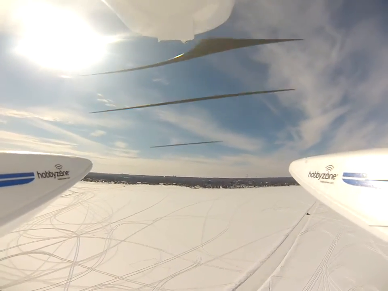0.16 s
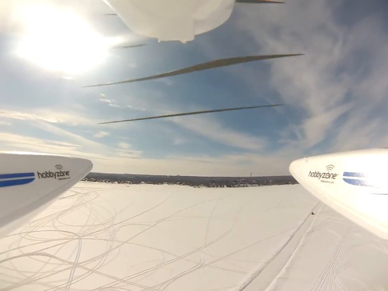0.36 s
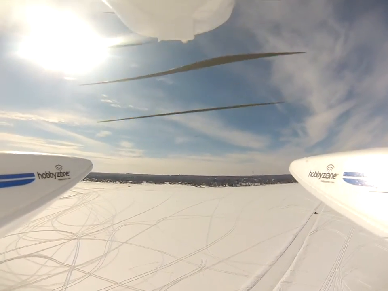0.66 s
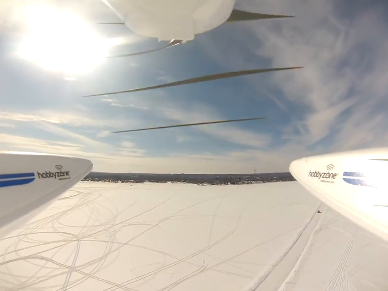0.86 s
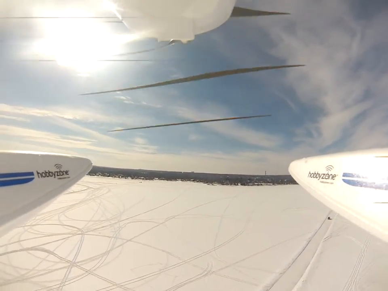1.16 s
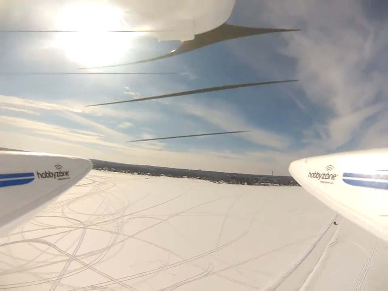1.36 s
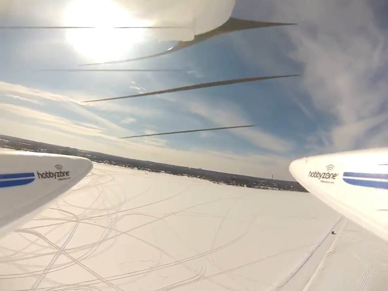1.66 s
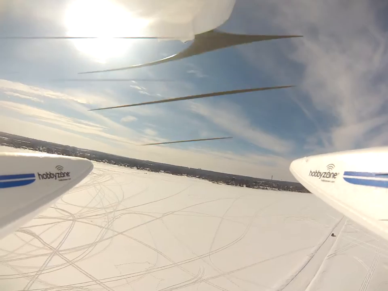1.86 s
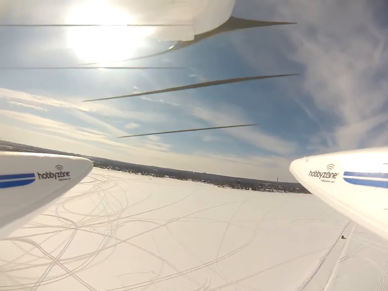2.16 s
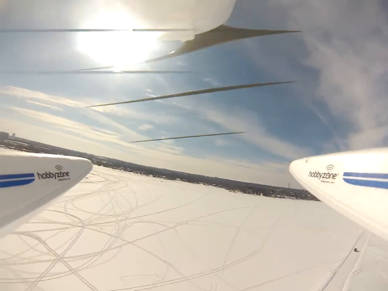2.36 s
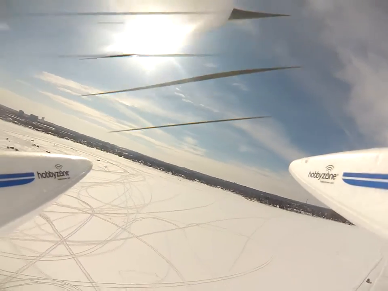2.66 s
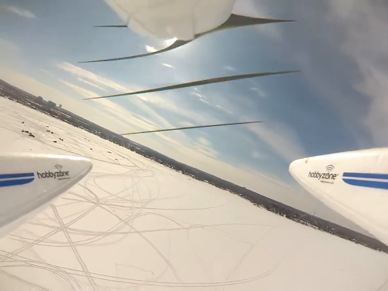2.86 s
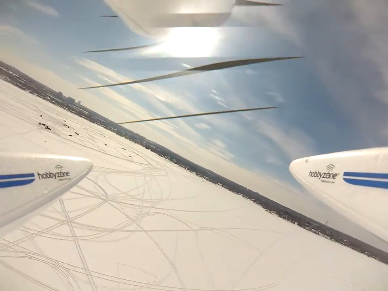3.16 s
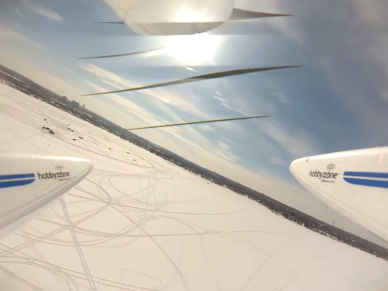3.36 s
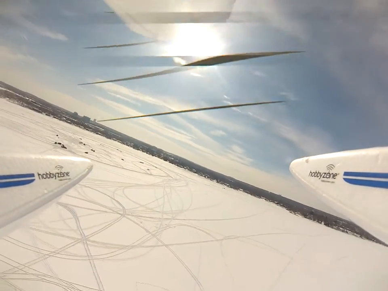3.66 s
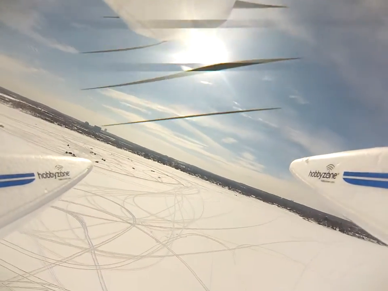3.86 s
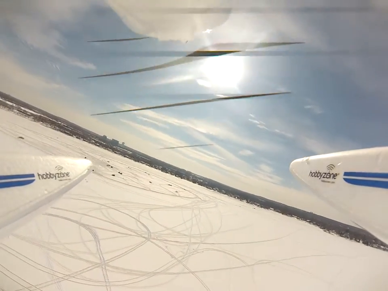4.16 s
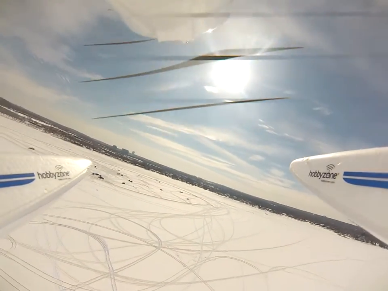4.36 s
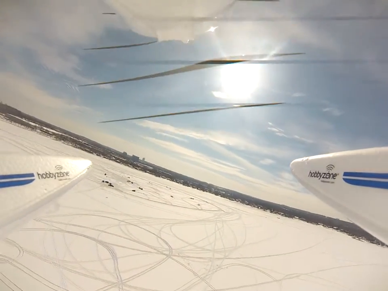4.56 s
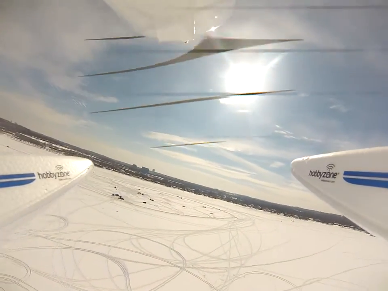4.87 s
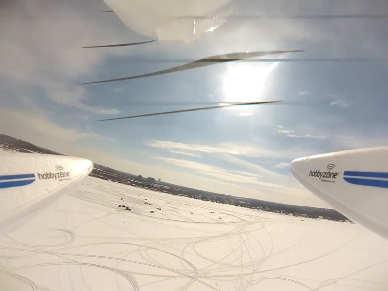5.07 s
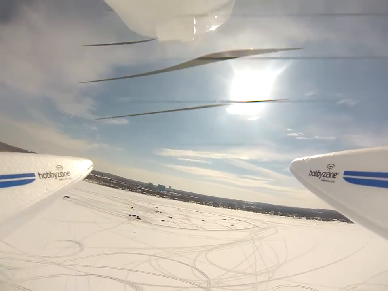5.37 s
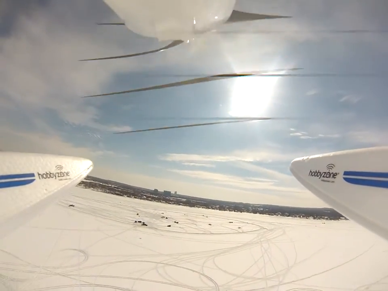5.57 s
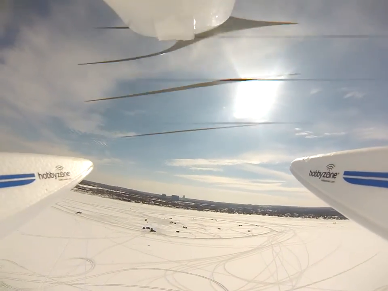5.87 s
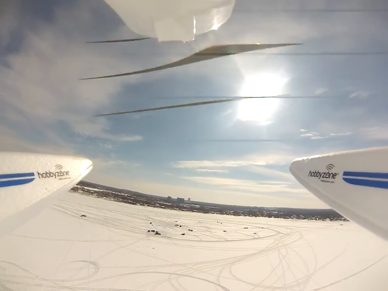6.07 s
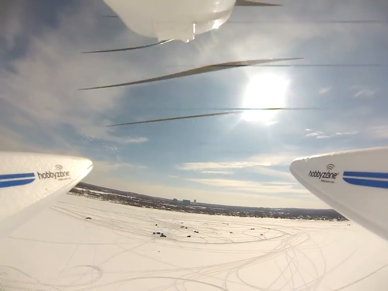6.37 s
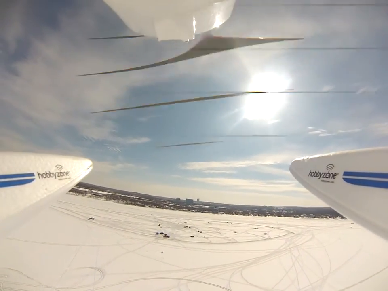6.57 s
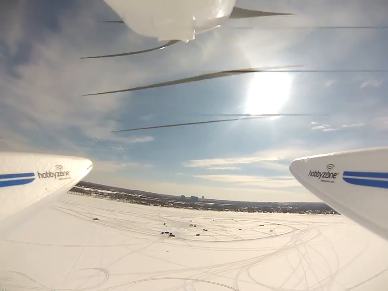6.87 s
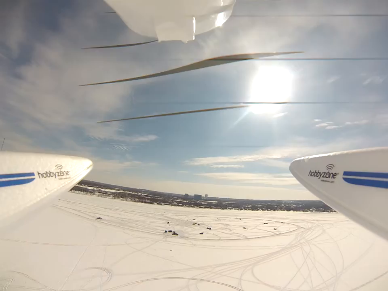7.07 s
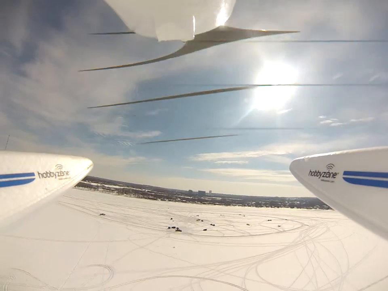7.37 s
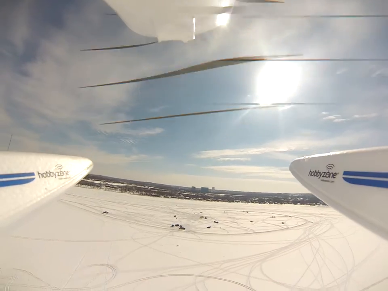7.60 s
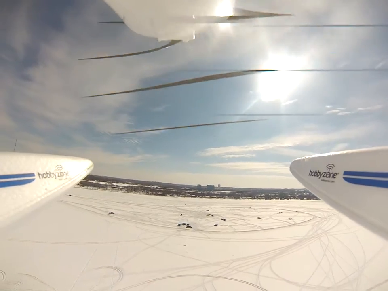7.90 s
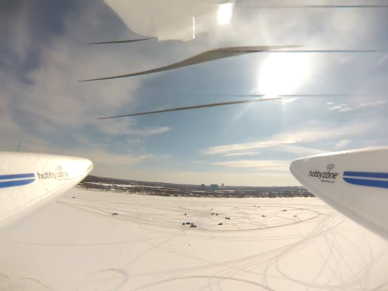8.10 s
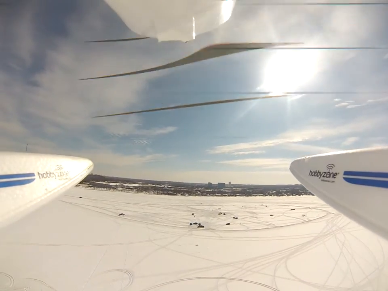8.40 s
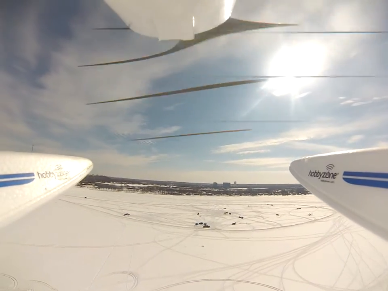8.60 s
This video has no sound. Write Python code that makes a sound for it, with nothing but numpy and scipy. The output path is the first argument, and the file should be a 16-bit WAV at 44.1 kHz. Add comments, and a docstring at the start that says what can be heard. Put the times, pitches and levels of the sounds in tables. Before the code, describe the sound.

Close, hard buzzing drone of a small electric plane in flight, with thin motor whine and airy hiss, dipping slightly in pitch late on.

```python
"""A hard propeller drone and motor whine, up close: a small electric model aeroplane in cruise,
heard by a microphone fixed under its nose; late on, the pitch sags by about half a semitone.
The two-blade propeller and fourteen-magnet motor shake the foam airframe at multiples of the shaft speed: sines.
The speed controller whistles and beats against the motor steps: sines at sums and differences of the two rates.
Behind them, shaped noise makes the slipstream's rumble, the airframe's buzz and the blades' rasp and hiss."""
import sys
import numpy as np
from scipy import signal
from scipy.fft import rfft, irfft, next_fast_len
from scipy.io import wavfile

SR = 44100
rng = np.random.default_rng(int(sys.argv[2]) if len(sys.argv) > 2 else 0)


def dump(signal):
    """Clip the signal to [-1, 1] and save it as 16-bit WAV at the path in sys.argv[1]."""
    limited = np.clip(np.atleast_2d(signal).T, -1, 1)
    pcm = np.round(limited * 32767).astype(np.int16)
    wavfile.write(sys.argv[1], SR, pcm)


N = 385434

# Shaft speed before gusts. Each row: time in seconds, speed in turns per second.
SHAFT_SPEED = [(0, 111.63), (1.4, 111.64), (2.12, 111.99), (2.64, 112.04), (2.72, 112.21), (3.32, 111.89),
               (3.44, 112.04), (4.04, 112.04), (4.4, 112.18), (5.24, 111.73), (5.4, 111.4), (5.8, 111.34),
               (6.0, 111.42), (6.6, 110.74), (7.1, 110.52), (7.24, 110.62), (7.46, 110.37), (7.66, 110.36),
               (7.73, 110.1), (7.88, 108.89), (8.1, 108.3), (8.26, 108.23), (8.4, 108.4), (8.5, 108.26),
               (8.74, 108.27)]
REFERENCE_SPEED = 112   # turns per second; sag is counted down from here
START_TURNS = 0.22   # shaft angle at the start

# The three tones that steer the others. Each row: time in seconds, controller whistle in dB rms,
# blade-pass tone in dB rms, third shaft multiple in dB rms.
LEADING_TONES = [(0.0, -47.7, -27.1, -54.9), (1.16, -47.9, -26.6, -52.8), (1.52, -47.1, -27.8, -55.3),
                 (1.92, -47.6, -26.4, -58.5), (2.08, -48.2, -25.6, -49.2), (2.96, -48.2, -26.1, -49.3),
                 (3.12, -47.2, -27.4, -53.9), (3.28, -47.8, -26.3, -58.7), (3.44, -48.3, -25.7, -49.3),
                 (4.16, -49.2, -24.6, -42.7), (4.72, -48.3, -25.6, -47.2), (5.0, -48.5, -25.3, -47.6),
                 (5.36, -47.7, -26.2, -58.5), (6.08, -47.7, -26.4, -50.6), (6.68, -46.9, -28.0, -40.3),
                 (7.56, -46.7, -28.6, -40.5), (7.92, -44.9, -28.6, -39.0), (8.74, -44.6, -29.1, -39.2)]
CRUISE_WHISTLE_DB, CRUISE_BLADE_DB, CRUISE_THIRD_DB = -47.5, -26.5, -50   # dB rms

# Steadier overtones of the shaft. Each row: shaft multiple, level in dB rms at the reference speed,
# change in dB per turn per second of sag.
STEADY_OVERTONES = [(5, -44, -0.05), (7, -56.5, 1.5), (8, -53.5, -2), (10, -64, 0.3), (11, -52, 0.1),
                    (16, -54.5, 1), (17, -55, 0), (18, -55.5, -0.7), (19, -55, 1.1), (20, -63.5, 1.5),
                    (21, -54, 0.4), (22, -60, 0.5), (23, -64, 0), (24, -67.5, 2.5), (25, -73, 0.5),
                    (27, -72, .1), (28, -64.5, 0), (29, -63, -1), (30, -71.5, 2), (31, -71, 2),
                    (33, -80.5, 4.5), (50, -82, 4.5)]
# Overtones that follow the flight. Each row: shaft multiple, level in dB rms in cruise, dB per dB of whistle,
# dB per turn per second of sag, dB per dB of blade-pass tone, dB change in a dip of depth 1.
FOLLOWING_OVERTONES = [(6, -38.5, -0.4, 0.27, -0.15, -3), (9, -51.2, -1.1, 2.0, 1.4, -11),
                       (12, -47.5, 5, 1, 7, -5), (13, -30, -0.35, 0.65, -0.5, 0),
                       (14, -36.5, 0.44, 1.5, -0.54, 1.2), (15, -57, -3.5, 5.5, -0.3, -3),
                       (42, -59.5, 3, -1, 2, -1)]
# Moments when some overtones dip briefly. Each row: time in seconds, relative depth.
OVERTONE_DIPS = [(1.55, 1.1), (3.13, 0.95), (5.45, 0.6)]
DIP_S = 0.09   # seconds from the middle of a dip to 1/e of its depth
# Where each overtone starts in its cycle: turns per multiple, turns per multiple squared.
STAGGER = (-.3, -.23)
BLADE_LAG_TURNS = 0.36   # second multiple against the first: slow fall, quick rise

# The first multiple gives way a little as the second grows: dB rms in cruise, dB per dB of blade-pass tone.
SHAFT_DB, SHAFT_PER_BLADE_DB = -13.84, -0.13
# The fourth follows the third, falls as the blade-pass tone grows and swells in a dip:
# dB rms in cruise, dB per dB of third, dB per dB of blade-pass tone, dB in a dip of depth 1.
FOURTH_DB, FOURTH_PER_THIRD_DB, FOURTH_PER_BLADE_DB, FOURTH_IN_DIP_DB = -52, 0.35, -0.6, 5.5

SWITCH_HZ = 7814.16   # switching rate of the speed controller
# Pitch of the strongest controller beat: shaft multiple, switching multiple.
STRONGEST_BEAT = (84, -1)
# Its level by pitch, before it merges. Each row: pitch in Hz, level in dB rms.
STRONGEST_BEAT_LEVEL = [(1270, -48), (1450, -45), (1560, -45.5), (1610, -48.5)]
# Fainter sum and difference tones. Each row: shaft multiple, switching multiple, level in dB rms.
FAINT_BEATS = [(-42, 1, -65.5), (-41, 1, -67.5), (168, -2, -68.5), (105, -1, -69), (83, -1, -63),
               (85, -1, -67.5), (1, 1, -81), (-43, 1, -67.5), (-39, 1, -71.5), (169, -2, -70)]
# Near the fourteenth multiple the strongest beat merges into it: width in Hz, gain of that multiple in dB.
LOCK_HZ, LOCK_GAIN_DB = 3.9, 1.4

# Noise spectra before any swelling, from the rumble up to the blade tips.
# Each row: frequency in Hz, level in dB per Hz.
SLIPSTREAM_SPECTRUM = [(20, -58), (34, -64.5), (62, -71.5), (110, -62.5), (140, -67.5), (190, -71.5),
                       (240, -73), (520, -82), (680, -80), (830, -83), (1100, -80)]
BUZZ_SPECTRUM = [(1100, -82.5), (1250, -74.5), (1450, -70), (1600, -72), (1850, -75.5), (2080, -70.5),
                 (2500, -81), (2900, -86), (3300, -87.5), (3700, -88), (4050, -87.5), (4400, -92.5)]
RASP_SPECTRUM = [(4400, -96), (4650, -89.5), (4850, -79.5), (5300, -89.5), (5800, -93.5)]
HISS_SPECTRUM = [(5800, -97.5), (6500, -86.5), (7000, -89), (7500, -95.5), (7900, -91), (8400, -95)]
TIP_SPECTRUM = [(8400, -97), (9900, -92.5), (11000, -94.5), (12200, -99), (13300, -96.5), (14400, -106),
                (15300, -107)]

CUTOFF_HZ = 15170   # top of what the microphone track holds


def shaft():
    """Running count of shaft turns, jogged by gusts, and how far the speed has sagged in turns per second."""
    speed, = in_time(SHAFT_SPEED)
    gusty_speed = speed + 0.03 * drift(9.1)
    turns = np.cumsum(gusty_speed) / SR + START_TURNS
    return turns, REFERENCE_SPEED - speed


def overtone_levels(sag, locked, current_db, bite_db, third_db):
    """Level in dB rms of each shaft multiple from the third up, as speed, current and blade tone change."""
    t = np.arange(N) / SR
    dip = sum(depth * np.exp(-((t - s) / DIP_S) ** 2) for s, depth in OVERTONE_DIPS)
    levels = {multiple: db + per_sag * sag for multiple, db, per_sag in STEADY_OVERTONES}
    for multiple, db, per_current, per_sag, per_bite, dip_db in FOLLOWING_OVERTONES:
        levels[multiple] = db + per_current * current_db + per_sag * sag + per_bite * bite_db + dip_db * dip
    levels[3] = third_db
    levels[4] = (FOURTH_DB + FOURTH_PER_THIRD_DB * (third_db - CRUISE_THIRD_DB)
                 + FOURTH_PER_BLADE_DB * bite_db + FOURTH_IN_DIP_DB * dip)
    levels[14] += LOCK_GAIN_DB * locked
    return levels


def propeller_and_motor(turns, sag, locked, whistle_db, blade_db, third_db):
    """Imbalance, blade passes and magnet pulls shake the airframe: lines locked to the shaft."""
    current_db = whistle_db - CRUISE_WHISTLE_DB
    bite_db = blade_db - CRUISE_BLADE_DB
    shaft_db = SHAFT_DB + SHAFT_PER_BLADE_DB * bite_db
    out = tone(turns, shaft_db, flutter_db=0.05, flutter_turns=0.0022)
    out += tone(2 * turns + BLADE_LAG_TURNS, blade_db, flutter_db=0.19, flutter_turns=0.0072)
    levels = overtone_levels(sag, locked, current_db, bite_db, third_db)
    for multiple, level_db in sorted(levels.items()):
        # weak lines waver more than strong ones
        faintness = max(-23 - np.mean(level_db), 0)
        # staggered starts keep the overtones from all peaking together
        start = STAGGER[0] * multiple + STAGGER[1] * multiple ** 2
        out += tone(multiple * turns + start, level_db,
                    flutter_db=0.04 * faintness, flutter_turns=0.0006 * faintness)
    return out


def strongest_beat(speed):
    """Level of the strongest beat in dB rms, and how far (0-1) it has merged into the fourteenth multiple."""
    beat_hz = STRONGEST_BEAT[0] * speed + STRONGEST_BEAT[1] * SWITCH_HZ
    locked = np.exp(-((beat_hz - 14 * speed) / LOCK_HZ) ** 2)
    free_db = np.interp(beat_hz, *np.transpose(STRONGEST_BEAT_LEVEL))
    return free_db - 22 * locked, locked


def controller(turns, beat_db, whistle_db):
    """The windings sing at the switching rate, which mixes with the motor steps into sums and differences."""
    switching = SWITCH_HZ * np.arange(N) / SR   # running count of switching cycles
    out = tone(switching, whistle_db, flutter_db=0.4, flutter_turns=0.004)
    beat_turns = STRONGEST_BEAT[0] * turns + STRONGEST_BEAT[1] * switching
    out += tone(beat_turns, beat_db, flutter_db=3.3, flutter_turns=0.03)
    for shaft_multiple, switch_multiple, db in FAINT_BEATS:
        faint_turns = shaft_multiple * turns + switch_multiple * switching
        out += tone(faint_turns, db, flutter_db=0.0, flutter_turns=0.023)
    return out


def airframe_buzz(load_db):
    """The airframe buzzes in a mid band of noise, a little louder under load, wavering slowly and quickly."""
    return coloured(BUZZ_SPECTRUM) * from_db(0.21 * load_db + 0.78 * drift(1.3) + 0.46 * drift(40.0))


def blade_noise(turns, load_db):
    """Clumpy rasp, hiss and tip hiss swell as each blade sweeps past, one blade more than the other."""
    each_blade = np.cos(4 * np.pi * (turns - 0.17))   # twice a turn
    uneven_blades = np.cos(2 * np.pi * (turns - 0.3))   # once a turn
    rasp_db = 0.76 * each_blade + 1.7 * uneven_blades + 0.9 * drift(3.6) + 1.0 * drift(45.0)
    hiss_db = 2.2 * each_blade + 0.99 * uneven_blades + 0.5 * drift(3.0)
    tips_db = 3.65 * each_blade + 0.8 * uneven_blades + 0.36 * drift(3.8)
    rasp = coloured(RASP_SPECTRUM) * from_db(rasp_db)
    hiss = coloured(HISS_SPECTRUM) * from_db(hiss_db)
    tips = coloured(TIP_SPECTRUM) * from_db(tips_db)
    return rasp + (hiss + tips) * from_db(0.33 * load_db)


def slipstream():
    """Turbulent air streaming past the nose: low noise whose level wanders with the gusts."""
    return coloured(SLIPSTREAM_SPECTRUM) * from_db(1.1 * drift(3.0))


def tone(turns, level_db, flutter_db, flutter_turns):
    """A sine of given rms level whose height and timing flutter at random by the given spreads."""
    height = from_db(level_db + flutter_db * drift(14.0))
    fluttering_turns = turns + flutter_turns * drift(13.0)
    return np.sqrt(2) * height * np.cos(2 * np.pi * fluttering_turns)


def coloured(spectrum):
    """Noise with the given level per Hz, practically silent outside the table."""
    size = next_fast_len(N)
    hz, db = np.transpose(spectrum)
    log_hz = np.log(np.arange(size // 2 + 1) * SR / size + 1e-3)   # the offset avoids log(0)
    level_db = np.interp(log_hz, np.log(hz), db, left=-200, right=-200)
    gain = from_db(level_db) * np.sqrt(SR / 2)   # white noise spreads its power over SR / 2
    return irfft(rfft(rng.standard_normal(size)) * gain, size)[:N]


def drift(rate_hz):
    """Slow random wander of spread 1: noise at every 64th sample, twice through a one-pole low-pass."""
    pole = np.exp(-2 * np.pi * rate_hz * 64 / SR)
    noise = rng.standard_normal(N // 64 + 1002)
    slow = signal.lfilter([1], [1, -2 * pole, pole * pole], noise)[1000:]   # drop the run-in
    return np.interp(np.arange(N) / 64, np.arange(len(slow)), slow / slow.std())


def in_time(rows):
    """Columns of a time table, joined by straight lines to one value a sample."""
    s, *columns = np.transpose(rows)
    return [np.interp(np.arange(N) / SR, s, column) for column in columns]


def from_db(db):
    """Decibels to amplitude gain."""
    return np.exp(np.asarray(db) * np.log(10) / 20)


def scene():
    """All sources reach the microphone dry, through air and foam, from close by."""
    whistle_db, blade_db, third_db = in_time(LEADING_TONES)
    turns, sag = shaft()
    beat_db, locked = strongest_beat(REFERENCE_SPEED - sag)
    load_db = whistle_db - whistle_db.mean()   # the whistle grows with the motor current
    mix = propeller_and_motor(turns, sag, locked, whistle_db, blade_db, third_db)
    mix += controller(turns, beat_db, whistle_db)
    mix += airframe_buzz(load_db)
    mix += blade_noise(turns, load_db)
    mix += slipstream()
    return mix[None, :]


def record(dry):
    """A steep elliptic low-pass cuts off the top of the treble."""
    low_pass = signal.ellip(14, 0.03, 70, CUTOFF_HZ, fs=SR, output="sos")   # order, ripple dB, stopband dB
    return signal.sosfilt(low_pass, dry)


dry = scene()
out = record(dry)
dump(out)
```